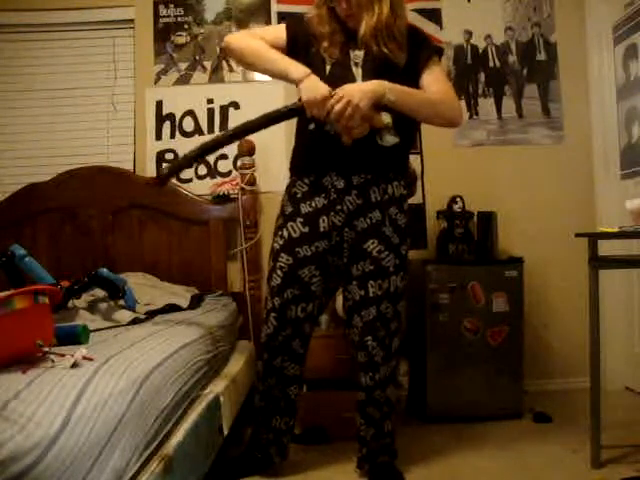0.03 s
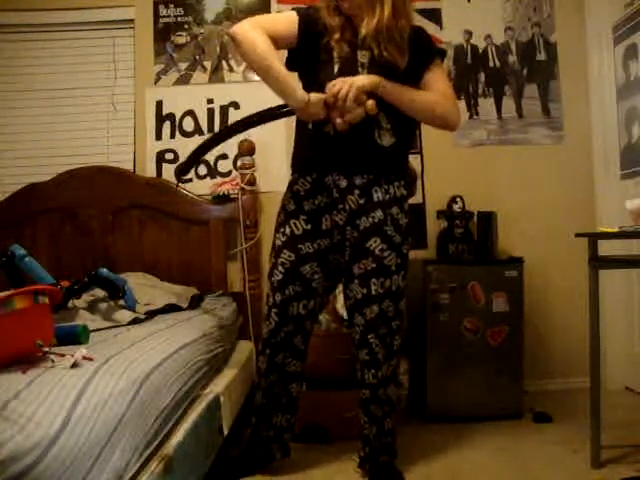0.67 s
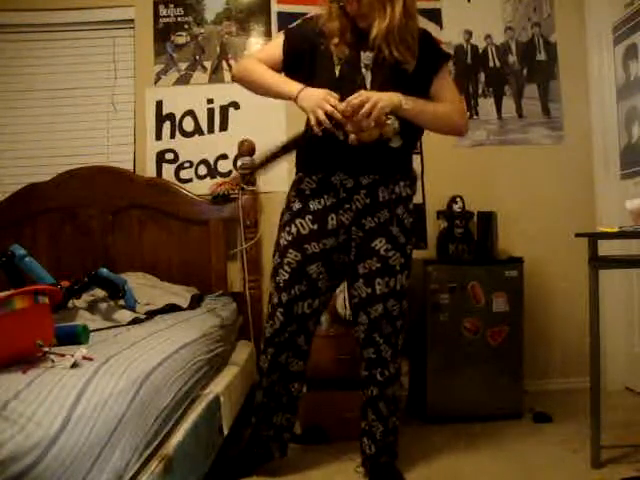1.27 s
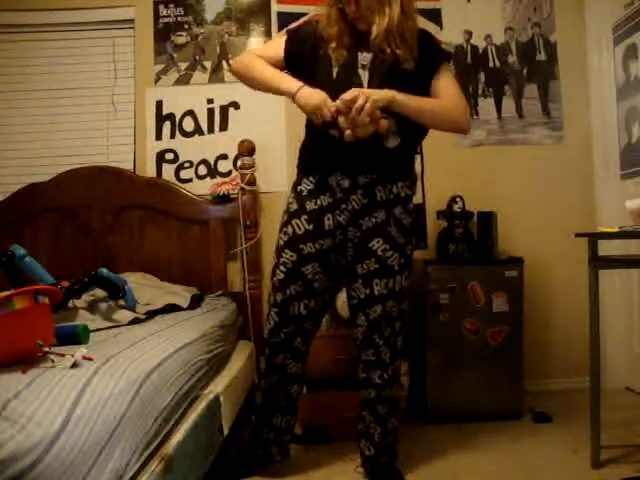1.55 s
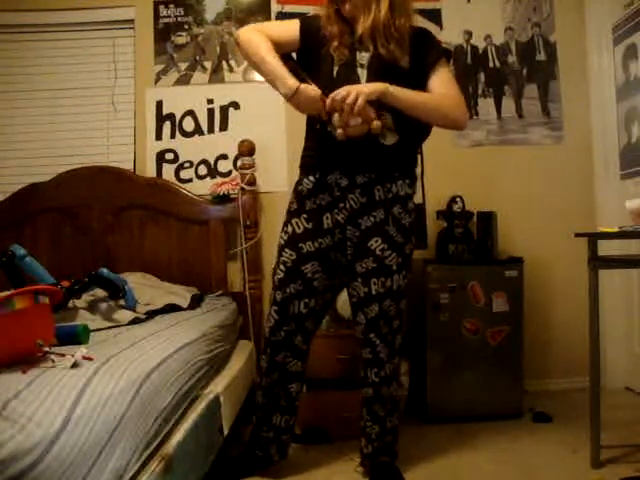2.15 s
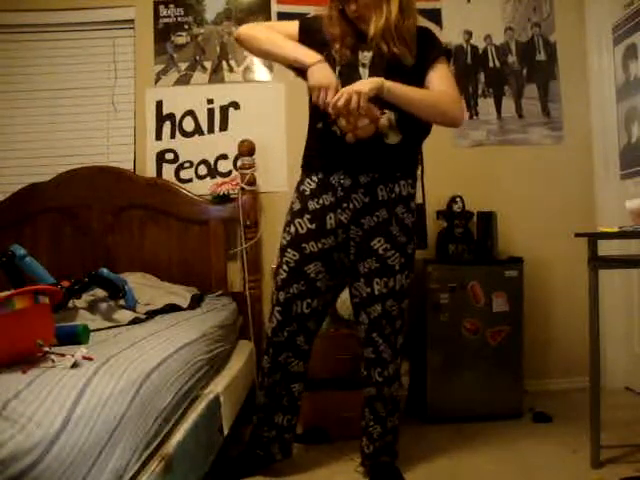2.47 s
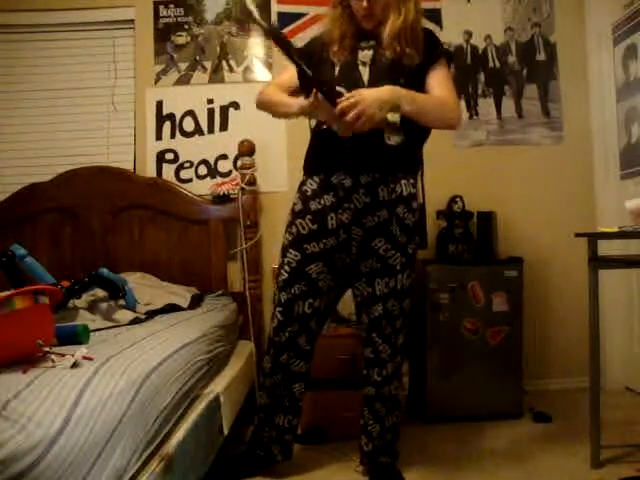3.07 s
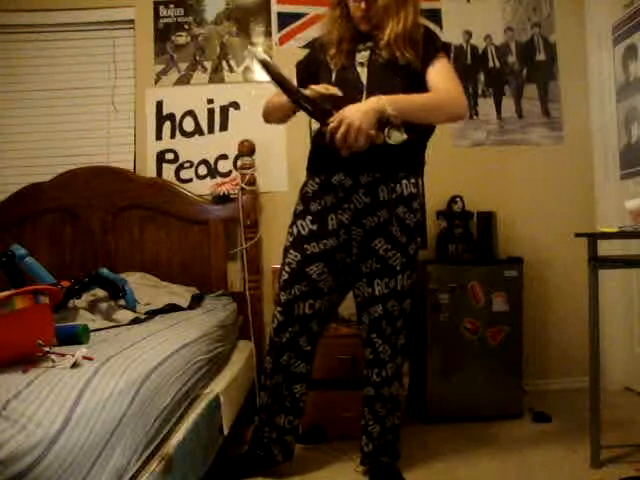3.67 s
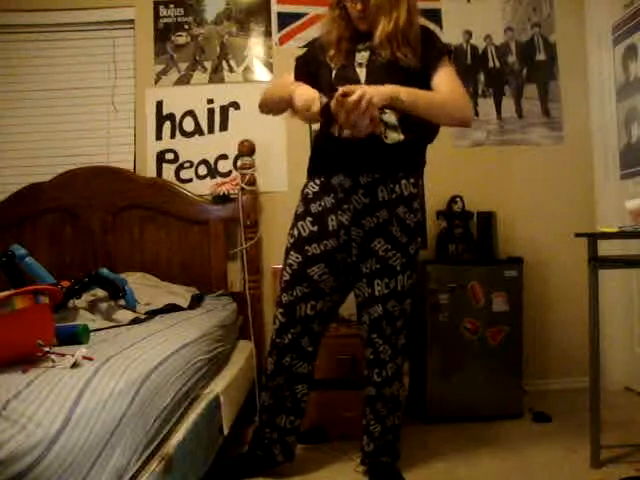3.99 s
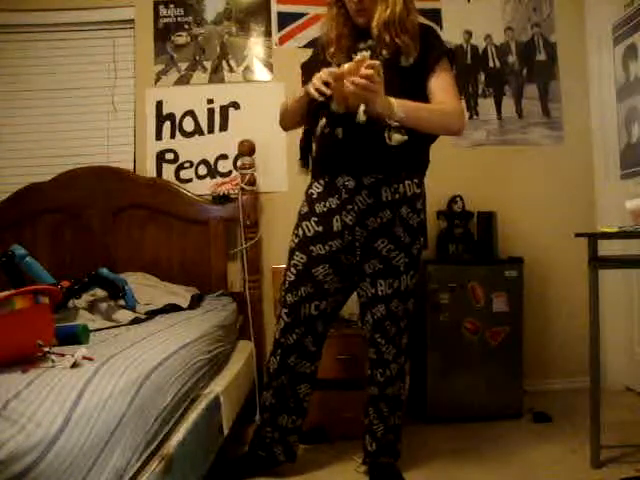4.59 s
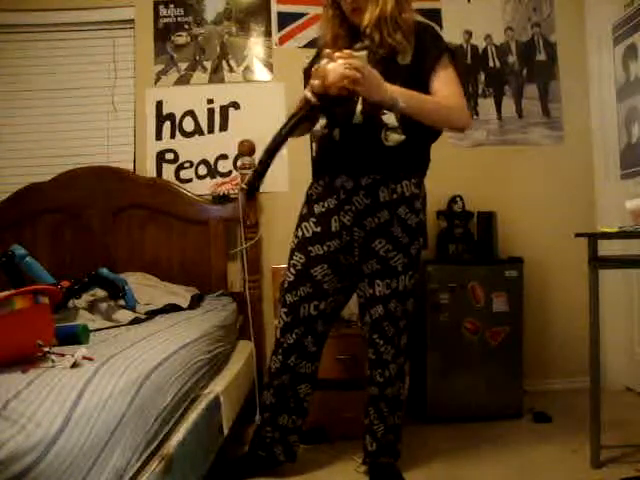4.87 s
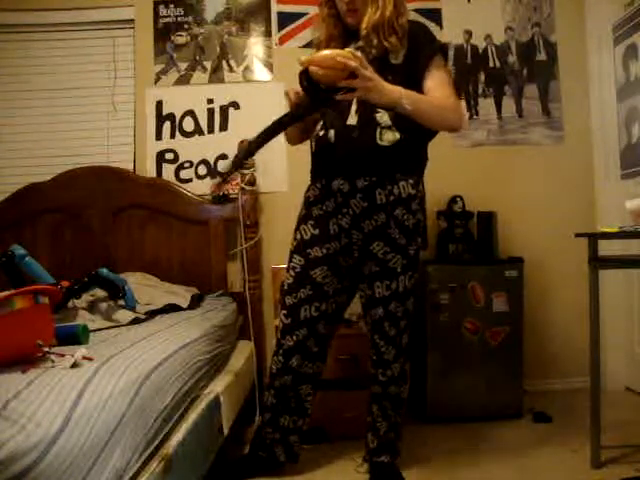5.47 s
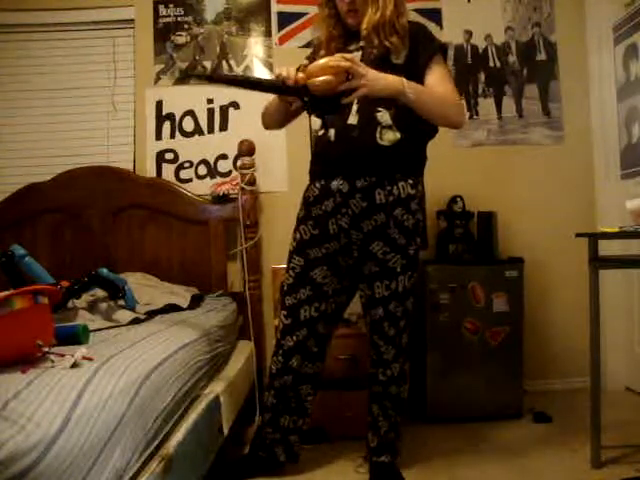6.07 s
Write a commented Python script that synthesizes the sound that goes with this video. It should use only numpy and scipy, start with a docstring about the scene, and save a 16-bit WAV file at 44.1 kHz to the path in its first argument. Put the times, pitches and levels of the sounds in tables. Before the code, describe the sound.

Hands twist and rub long balloons together, with uneven creaks, brief high squeals, light finger taps and sharp clicks.

```python
"""Twisting latex balloons

Hands twist long balloons together in a bedroom. Taut rubber sticks and slips: uneven slips creak,
fast regular ones squeal. Fingers tap and scuff the air-filled skins. Sharp, dry snaps mark the onsets
of some creaks and squeals. The room rings briefly after all but the snaps, over a faint hiss."""
import sys
import numpy as np
from scipy import signal
from scipy.fft import rfft, irfft
from scipy.io import wavfile
from scipy.ndimage import uniform_filter1d

SR = 44100
rng = np.random.default_rng(int(sys.argv[2]) if len(sys.argv) > 2 else 0)


def to_wav(s):
    """Save 16-bit WAV."""
    ch = np.atleast_2d(s).T  # columns
    pcm = np.round(np.clip(ch, -1, 1) * 32767)  # PCM
    wavfile.write(sys.argv[1], SR, pcm.astype(np.int16))


N = 279594

# Rubber-on-rubber strokes: t/s, length/s, level/dB, hollow/dB, edge/dB (bass, treble re 2.4 kHz)
STROKES = [(0.001, 0.011, -26.5, -2, -8.5), (0.031, 0.071, -43, 2.5, -13), (0.312, 0.016, -40.5, -13, -7.5),
           (0.707, 0.0091, -35, -20, -11), (0.724, 0.018, -30, -12, -11), (0.799, 0.0028, -20.5, -11, 0.5),
           (0.815, 0.018, -33, -7, -41), (0.844, 0.053, -19, -13, -7), (1.051, 0.013, -34.5, -5, -9.5),
           (1.175, 0.0032, -26, -20.5, -18.5), (1.213, 0.014, -36.5, -21, -2.5),
           (1.444, 0.023, -28, -11, -12), (1.492, 0.018, -29.5, -34, -5.5), (1.551, 0.015, -36.5, -11, -1),
           (1.695, 0.0052, -20.5, -19, -5), (1.751, 0.015, -31, -14, -16), (1.856, 0.0084, -22.5, -28, -10),
           (1.871, 0.017, -39.5, -3, -19), (1.907, 0.039, -18, -15, -10), (2.148, 0.012, -29.5, -15, -10),
           (2.417, 0.0076, -35, -25, -19), (2.437, 0.027, -25, -15.5, -10), (2.998, 0.018, -37, 13, -10),
           (3.102, 0.024, -47.5, 13, -16), (3.167, 0.013, -35.5, 9.5, -17), (3.222, 0.012, -28, -1.5, 1.5),
           (3.248, 0.023, -33, -25, -1), (3.301, 0.014, -36.5, -21, -3.5), (3.455, 0.0099, -38, -9, -53),
           (3.474, .016, -23.5, -10.5, -5), (3.563, 0.0098, -27.5, 1.5, -7), (3.784, 0.0152, -31, 6, -9),
           (3.969, 0.0132, -27.5, 0.5, -4.5), (3.995, .014, -31.5, -17, -15), (4.019, 0.01, -33.5, -13, -4),
           (4.296, .027, -42.5, 15.5, -3), (4.472, 0.015, -47.5, 1, -21), (4.625, 0.0095, -38, 3, -19),
           (4.643, 0.013, -34.5, -2, -19), (4.665, 0.035, -44.5, -4, -15), (4.793, 0.015, -35.5, 15.5, -11),
           (4.937, 0.02, -39, 0, -11.5), (5.066, 0.038, -47, 11, 0), (5.315, 0.015, -42, 3, 0),
           (5.474, 0.038, -49, -21, -2), (5.627, 0.055, -26, -38.5, -4.5), (5.717, 0.0244, -25, -16, -12.5),
           (6.125, 0.0057, -38.5, 22, -27), (6.146, 0.019, -30.5, 6.5, -15), (6.225, 0.046, -49, 17, -21)]


def creaks(mid_rate_hz=290, mid_db=-32, db_per_doubling=20.5):
    """Twisting strokes; a harder stroke slips faster. Yields (t, sound)."""
    for start_s, length_s, db, hollow_db, edge_db in STROKES:
        rate_hz = mid_rate_hz * 2 ** ((db - mid_db) / db_per_doubling)
        creak = gripped_skin(stick_slip(length_s, rate_hz), hollow_db, edge_db)
        yield start_s, undb(db) * np.sqrt(length_s * SR) * creak


def stick_slip(length_s, rate_hz, jitter=0.35, scatter_db=4, bite_db=2, ease_db=-1, scuff_gain=0.69):
    """Uneven slips with a firm first bite; after each, the rubber scuffs on until it sticks."""
    gap_draw, size_draw = rng.standard_normal((64, 2)).T
    gaps_s = np.exp(jitter * gap_draw) / rate_hz
    times_s = np.cumsum(gaps_s) - gaps_s[0]
    sizes = undb(scatter_db * size_draw + ease_db * times_s / length_s)
    sizes[0] = undb(bite_db)
    inside = times_s < length_s
    slips = np.zeros(int(length_s * SR) + 512)
    np.add.at(slips, (times_s[inside] * SR).astype(int), sizes[inside])
    slide_s = 0.41 / rate_hz
    sliding = signal.lfilter([1], [1, -np.exp(-1 / (slide_s * SR))], slips)
    scuff = sliding * rng.standard_normal(SR // 2)[:len(slips)]
    return unit(slips) + scuff_gain * unit(scuff)


def gripped_skin(push, hollow_db, edge_db, ring_spread_oct=0.15):
    """A broader, softer (hollower) grip moves more of the skin and lets the bubble ring lower."""
    ring_hz = 853 * 2 ** (ring_spread_oct * rng.standard_normal() - hollow_db / 117)
    body_db = 5 + 0.56 * hollow_db
    return skin(push, hollow_db, body_db, edge_db, ring_hz)


def skin(push, hollow_db, body_db, edge_db, ring_hz, ring_db=-5, ring_q=2.95):
    """Shaken skin: soft contact sounds hollow, a pinch sharp; the bubble rings at its own pitch."""
    colour = [(60, hollow_db - 30), (150, hollow_db - 12), (260, hollow_db - 4), (400, hollow_db + 2.5),
              (700, body_db), (1400, body_db / 2), (2400, 0),
              (4200, edge_db / 3), (7000, edge_db), (10000, edge_db - 7), (13000, edge_db - 69)]
    shaken = signal.fftconvolve(push, impulse_response(colour))
    ring = signal.lfilter(*signal.iirpeak(ring_hz, ring_q, fs=SR), shaken)
    return unit(shaken + undb(ring_db) * ring)


# Regular stick-slip: t/s, length/s, first f/Hz, settled f/Hz, level/dB, wobble/fraction of f,
# overtone slope/(dB/oct), low cut/Hz
SQUEAL_NOTES = [(0.288, 0.0063, 1890, 1610, -36, 0.23, -26, 1100),
                (1.421, 0.024, 3625, 2062, -15, .13, -6, 1600),
                (3.724, 0.035, 2270, 2323, -13.5, 0.03, -3, 1510),
                (3.761, 0.03, 2415, 2330, -24.5, 0.01, -1.5, 1470),
                (4.779, 0.034, 2214, 2056, -37.5, 0.11, -11, 1200),
                (5.625, 0.029, 773.5, 751, -17.5, 0.06, -4, 2030),
                (5.659, 0.022, 577.5, 568, -21, 0.06, -6, 2180),
                (5.653, 0.08, 315, 282, -40.5, 0.12, -4, 200)]


def squeals(settle_s=0.008, attack_s=0.0042, hold_share=0.67, end_db=-9, wobble_s=0.0014):
    """Slips lock into a pitch that glides and trembles with the tension. Yields (t, sound)."""
    orders = np.arange(2, 34)[:, None] / 2
    for start_s, length_s, first_hz, settled_hz, db, wobble, slope_db, low_hz in SQUEAL_NOTES:
        t = np.arange(int(length_s * SR)) / SR
        onset = np.exp(-(t / settle_s) ** 2)
        hz = settled_hz + (first_hz - settled_hz) * onset
        attack = np.clip(t / attack_s, 0, 1) ** 2
        release = undb(np.interp(t / length_s, [hold_share, 1], [0, end_db]))
        unsteady = wobble * (1 - 0.47 * onset)
        tremble = uniform_filter1d(rng.standard_normal((2, SR // 2)), int(wobble_s * SR))
        pitch_tremble, level_tremble = (tremble / tremble.std())[:, :len(t)] * unsteady
        phase = 2 * np.pi * np.cumsum(hz * (1 + pitch_tremble)) / SR
        # An unsteady grip alternates strong and weak slips, adding half orders.
        half_gain = np.minimum((5 * unsteady) ** 2, 1)
        partials = undb(slope_db * np.log2(orders)) * np.where(orders % 1, half_gain, 1)
        partials *= patch_gain(orders * hz, low_hz)
        rms = np.sqrt(np.sum(partials ** 2, axis=0) / 2)
        tone = np.sum(partials * np.sin(orders * phase), axis=0) / rms
        yield start_s, tone * attack * release * undb(db + 16 * level_tremble)


def patch_gain(hz, low_hz, peak_hz=2300, half_width_hz=150, peak_db=1.5, top_hz=8600):
    """The small pinched patch has one resonance and radiates lows and highs poorly."""
    resonance = undb(peak_db / (1 + ((hz - peak_hz) / half_width_hz) ** 2))
    low_cut = 1 / np.sqrt(1 + (low_hz / hz) ** 8)
    high_cut = (hz < SR / 3) / np.sqrt(1 + (hz / top_hz) ** 10)
    return resonance * low_cut * high_cut


# Clicks at creak and squeal onsets: t/s, peak level/dB
SNAPS = [(0.8033, -15.5), (0.8478, -3), (1.445, -40), (1.9073, -11.5), (2.441, -22), (3.223, -25),
         (3.729, -27), (5.63, -21.5), (5.719, -25)]


def snaps(crack_s=0.000061, rebound_s=0.00054):
    """Sharp, dry clicks with a low thump: a quick dip, then a slow rebound."""
    t = np.arange(512) / SR
    dip = t / crack_s * np.exp(1 - t / crack_s)
    rebound = 0.17 * t / rebound_s * np.exp(-t / rebound_s)
    track = np.zeros(N)
    for start_s, db in SNAPS:
        add(track, start_s, undb(db) * (rebound - dip))
    return track


# Flicks and finger taps: t/s, level/dB, hollow/dB, edge/dB
FINGER_TAPS = [(0.116, -33, 7.5, -10), (0.193, -38.5, -3, -4), (0.262, -38, -6, 9), (0.294, -36, -10, -3),
               (0.384, -39, 21, -4), (0.417, -39, -4, -1), (1.283, -37, -7, 3), (1.326, -36, -1, -26),
               (1.402, -32.5, 5, -40), (2.664, -35, 12.5, -10), (2.774, -37, -25, 4.5),
               (2.909, -38.5, 21, 2), (3.9, -36, 5, -10), (4.085, -32, -19, 0.5), (4.134, -31, -7, 6),
               (4.428, -40, 30, -27), (4.582, -34.5, 12, -18), (5.036, -31, 10, -18),
               (5.121, -22.5, 12.5, -13.5), (5.446, -25, 23.5, -11), (6.05, -37, -25, -16)]


def taps(contact_s=0.0021, scuff_gain=0.98, scuff_s=0.016):
    """One slip and a brief fingertip scuff. Yields (t, sound)."""
    t = np.arange(1024) / SR
    for start_s, db, hollow_db, edge_db in FINGER_TAPS:
        scuff = unit(rng.standard_normal(len(t)) * np.exp(-t / scuff_s))
        push = signal.unit_impulse(len(t)) + scuff_gain * scuff
        yield start_s, undb(db) * np.sqrt(contact_s * SR) * gripped_skin(push, hollow_db, edge_db)


def finger_creep(mean_db=-43, scuff_s=0.0056, count=130):
    """Fingers creep over the rubber throughout, in tiny scuffs. Yields (t, sound)."""
    fade = np.exp(-np.arange(1024) / SR / scuff_s)
    for slot, (force, softness, tension) in enumerate(rng.uniform(-1.7, 1.7, (count, 3))):
        push = rng.standard_normal(len(fade)) * fade
        scuff = skin(push, hollow_db=3 + 4 * softness, body_db=6 + 4 * softness, edge_db=-6,
                     ring_hz=800 * 2 ** (tension / 2))
        start_s = (slot + rng.random()) * N / SR / count
        yield start_s, undb(mean_db + 2 * force) * np.sqrt(SR / 1000) * scuff


# Bedroom decay: f/Hz, T60/s
BEDROOM_DECAY = [(150, 0.13), (400, 0.52), (800, 0.37), (1400, 0.47), (2500, 0.28), (4500, 0.28),
                 (8000, 0.22)]


def bedroom(sounds, direct_db, early_db, tail_db, early_s=0.003, build_s=0.0041, echo_count=40):
    """Direct sound, body and furniture echoes, diffuse tail; echoes vary as the balloon moves."""
    t = np.arange(SR // 2) / SR
    spectrum = rfft(rng.standard_normal(4 * len(t)))
    hz = np.fft.rfftfreq(4 * len(t), 1 / SR)
    bin_octave = np.round(np.log2(np.clip(hz, 150, 10000) / 150))
    octaves = np.unique(bin_octave)
    bands = np.array([irfft(spectrum * (bin_octave == k)) for k in octaves])
    t60_s = interp_log_hz(150 * 2 ** octaves, BEDROOM_DECAY)[:, None]
    fades = undb(-60 * t / t60_s) * (1 - np.exp(-t / build_s))
    track = np.zeros(N)
    for start_s, sound in sounds:
        offset = rng.integers(bands.shape[1] - len(t))
        tail = np.sum(bands[:, offset:offset + len(t)] * fades, axis=0)
        early = np.zeros(SR // 30)
        early[rng.integers(SR // 2000, len(early), echo_count)] = rng.choice([-1, 1], echo_count)
        early *= np.exp(-t[:len(early)] / early_s)
        add(track, start_s, undb(direct_db) * sound)
        for db, echoes in (early_db, early), (tail_db, tail):
            reflected = unit(signal.fftconvolve(sound, echoes))
            add(track, start_s, undb(db) * np.linalg.norm(sound) * reflected)
    return track


# Noise floor spectrum: f/Hz, relative density/dB
NOISE_FLOOR = [(18, -39), (30, -12.5), (139, -12.5), (468, 0.5), (582, -7.5), (838, 2.5), (1740, -8.5),
               (2160, 0.5), (2830, -9), (4380, -9.5), (10000, -16), (13000, -40.5), (22000, -120)]


def hiss(rms_db=-55):
    """Steady room and microphone noise."""
    colour = undb(interp_log_hz(np.fft.rfftfreq(N, 1 / SR), NOISE_FLOOR))
    noise = irfft(rfft(rng.standard_normal(N)) * colour, N)
    return undb(rms_db) * np.sqrt(N) * unit(noise)


def undb(db):
    """Decibels to gain."""
    return 10 ** (np.asarray(db) / 20)


def unit(x):
    """Scale to unit energy."""
    return x / np.sqrt(np.sum(x ** 2) + 1e-18)


def add(track, start_s, sound):
    """Mix a sound into the track."""
    i = max(int(start_s * SR), 0)
    track[i:i + len(sound)] += sound[:len(track) - i]


def interp_log_hz(hz, points):
    """Interpolate (f/Hz, value) points over log frequency."""
    point_hz, values = np.transpose(points)
    return np.interp(np.log(hz + 1), np.log(point_hz), values)


def impulse_response(points, size=1024):
    """Minimum-phase filter from (f/Hz, level/dB) points."""
    gain = undb(interp_log_hz(np.fft.rfftfreq(size, 1 / SR), points))
    cepstrum = irfft(np.log(gain))
    cepstrum[1:size // 2] *= 2
    cepstrum[size // 2 + 1:] = 0
    return irfft(np.exp(rfft(cepstrum)))


def scene():
    """Mono mix; squeals beam more sound straight ahead, snaps stay dry."""
    rubber = bedroom([*creaks(), *taps(), *finger_creep()], direct_db=-8, early_db=-1, tail_db=-2)
    squealing = bedroom(squeals(), direct_db=-3, early_db=-10, tail_db=-5.5, early_s=0.0036)
    return (rubber + squealing + snaps() + hiss())[None]


def record(dry):
    """Steep low-pass at 10050 Hz."""
    return signal.sosfilt(signal.ellip(12, 0.2, 75, 10050, fs=SR, output="sos"), dry)


dry = scene()
out = record(dry)
to_wav(out)
```